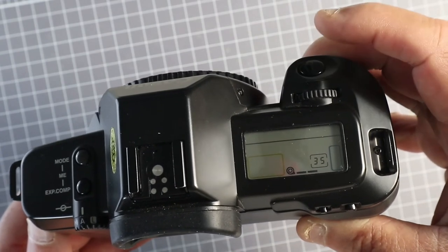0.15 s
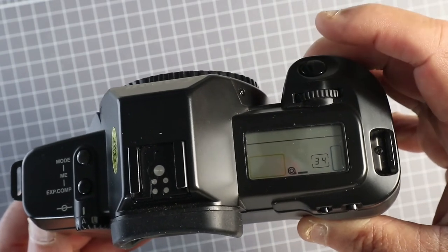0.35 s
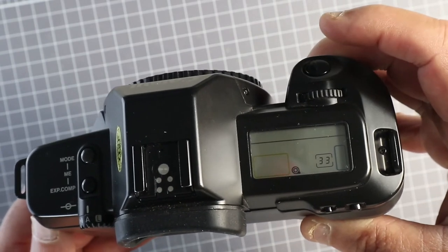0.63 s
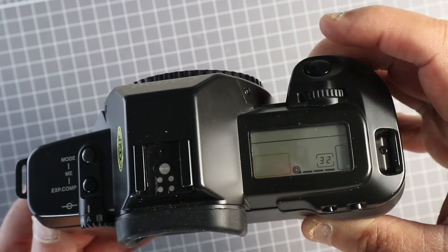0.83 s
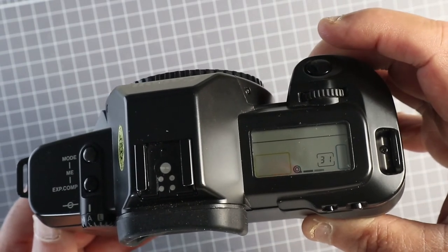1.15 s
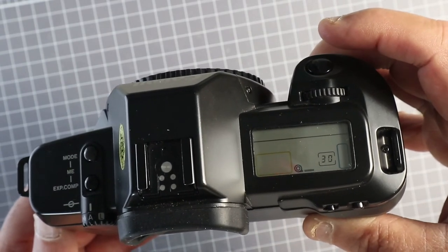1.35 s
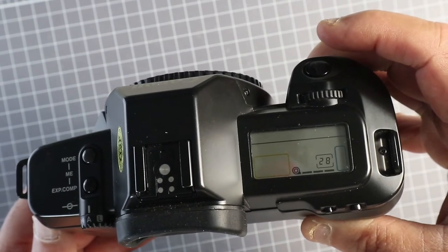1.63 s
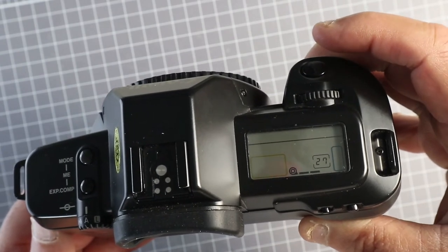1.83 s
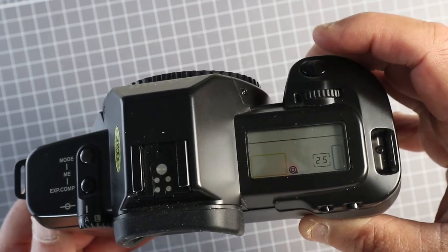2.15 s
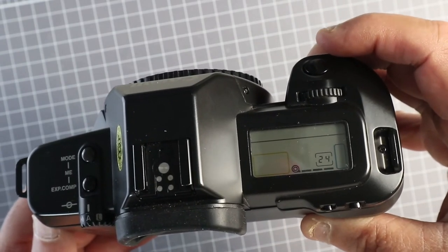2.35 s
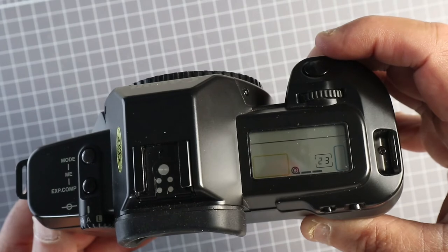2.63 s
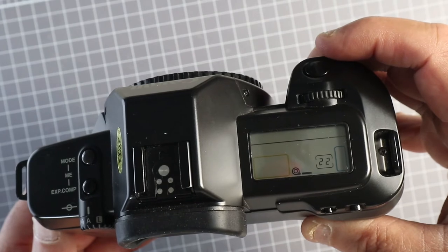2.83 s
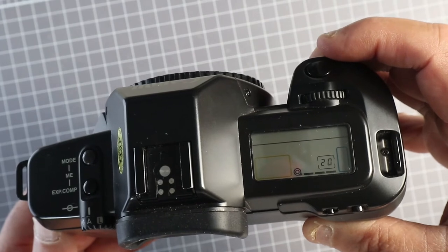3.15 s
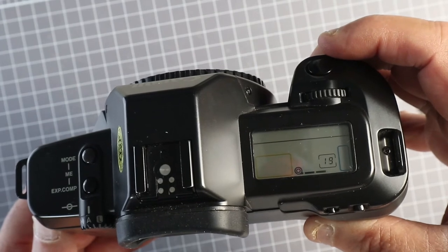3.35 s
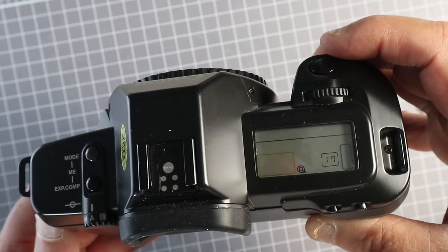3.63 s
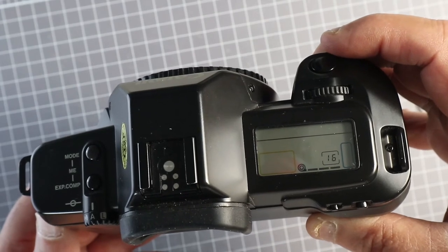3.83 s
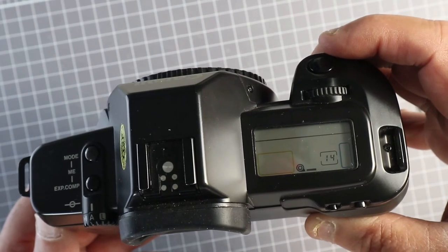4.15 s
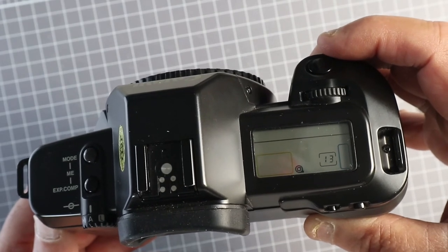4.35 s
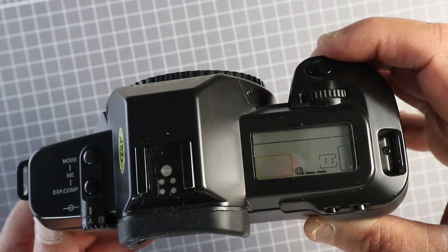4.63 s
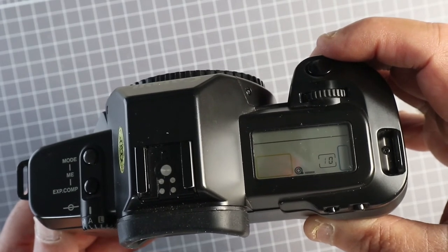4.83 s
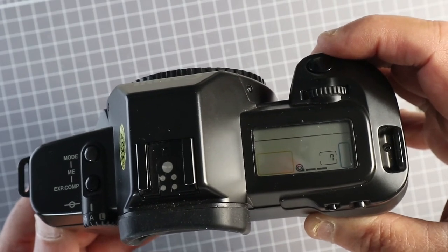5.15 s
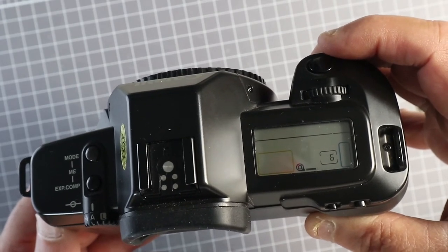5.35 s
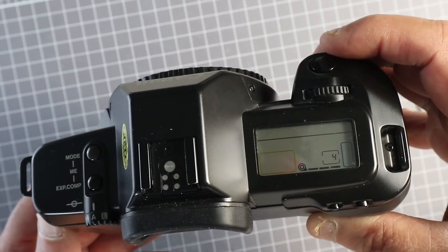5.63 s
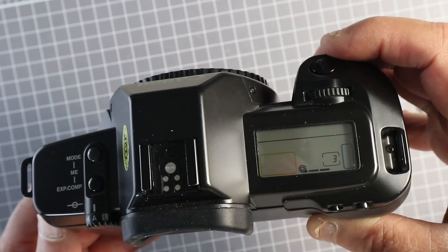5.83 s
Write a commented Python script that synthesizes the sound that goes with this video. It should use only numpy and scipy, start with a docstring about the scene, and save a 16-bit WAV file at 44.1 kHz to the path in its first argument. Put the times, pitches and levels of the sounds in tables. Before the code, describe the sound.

A small camera's geared motor whines steadily up close as it winds film back, rattling finely, with soft plastic knocks growing more frequent near the end.

```python
"""A geared motor spins up and whines close to the microphone: a small camera winding its film back.
The whine sums gear-mesh harmonics with side tones; it slows as the spool fills. Noise makes the rattle.
A second, steadier motor already runs beside it: thin tones and pulsing brush hiss.
The spool knocks softly in the plastic body, as struck resonances ringing out.
Behind them lie mains hum and the low noise of a quiet room."""
import sys
import numpy as np
from scipy import signal
from scipy.fft import rfft, irfft, next_fast_len
from scipy.io import wavfile

SR = 44100
rng = np.random.default_rng(int(sys.argv[2]) if len(sys.argv) > 2 else 0)


def volts_from_db(level):
    """Convert decibel levels to linear amplitude ratios."""
    exponent = np.asarray(level, float) / 20
    return 10 ** exponent


def transcribe(signal):
    """Save signal, clipped to [-1, 1], as a 16-bit WAV file at the path in sys.argv[1]."""
    frames = np.atleast_2d(signal).T
    limited = np.clip(frames, -1, 1)
    pcm = np.round(limited * 32767).astype(np.int16)
    wavfile.write(sys.argv[1], SR, pcm)


N = 264159  # samples

WHEEL_TEETH, PINION_TEETH = 23, 10

# base levels beside and within the geared motor, before trims and wavers:
# time_s, strongest_steady_tone_db, fifth_geared_shaft_harmonic_db, second_steady_tone_db
TONE_LEVELS = [(0.0, -44, -61, -49), (0.1, -39, -55, -40), (0.3, -37, -53, -46), (1.05, -36.5, -38.5, -40),
               (1.5, -38, -46.5, -43), (2.7, -37.5, -39, -46.5), (4.3, -37, -43.5, -49),
               (4.8, -37, -45, -45), (5.99, -36, -47, -47)]


def rms_one(x):
    """Scales a real or complex signal to rms 1."""
    return x / np.sqrt(np.mean(np.abs(x) ** 2) + 1e-20)


def in_time(rows):
    """Draws each column of a timed table as a line over the whole take."""
    s, *columns = np.transpose(rows)
    t = np.arange(N) / SR
    return [np.interp(t, s, column) for column in columns]


def drift(hz):
    """A slow random waver: white noise twice through a one-pole low-pass, run in; rms 1."""
    r = np.exp(-2 * np.pi * hz / SR)
    noise = rng.standard_normal(N + SR)
    return rms_one(signal.lfilter([1], [1, -2 * r, r * r], noise)[SR:])


def uneven(hz):
    """Complex noise up to hz with a steep edge; rms 1."""
    low_pass = signal.butter(3, hz, fs=SR, output="sos")
    real, imag = signal.sosfilt(low_pass, rng.standard_normal((2, N)))
    return rms_one(real + 1j * imag)


def coloured(x, spectrum):
    """Shapes a signal by a (Hz, dB) curve, drawn over log frequency; rms 1."""
    hz, db = np.transpose(spectrum)
    size = next_fast_len(N)
    log_hz = np.log(np.arange(size // 2 + 1) * SR / size + 1)
    gain = volts_from_db(np.interp(log_hz, np.log(hz), db, -80, -80))
    return rms_one(irfft(rfft(x, size) * gain, size)[:N])


def resonance(x, hz, width_hz):
    """Two-pole band-pass with gain 1 on top."""
    r = np.exp(-np.pi * width_hz / SR)
    poles = [1, -2 * r * np.cos(2 * np.pi * hz / SR), r * r]
    return signal.lfilter(np.array([1, 0, -1]) * (1 - r * r) / 2, poles, x)


def tone(turns, db):
    """A sine that follows an angle in turns; db is its rms level."""
    return np.sqrt(2) * volts_from_db(db) * np.sin(2 * np.pi * turns)


def throb(turns, db):
    """An off-round wheel bites hard once a turn: a short swell, a longer lull; rms 1."""
    a = 2 * np.pi * turns
    return rms_one(volts_from_db(db * (np.cos(a) + .45 * np.cos(2 * a) + .25 * np.cos(3 * a))))


def gear_angles():
    """Wheel and spool angles in turns; the film tugs at the speed once and twice a spool turn."""
    # first gear wheel before the tug: time_s, speed_turns_per_s
    wheel_speed = [(0, 76), (0.06, 80.5), (0.15, 81.44), (0.45, 81.221), (1.05, 80.69), (1.35, 80.664),
                   (1.65, 80.745), (2.25, 80.482), (2.85, 80.436), (3.15, 80.286), (3.45, 79.861),
                   (3.75, 79.634), (4.05, 79.698), (4.35, 79.407), (4.65, 78.917), (4.95, 78.61),
                   (5.55, 78.51), (5.99, 78.7)]
    wheel_start, spool_start = .28, -.09  # turns
    spool_ratio = .0559  # spool turns per wheel turn
    tug_share = 0.00371  # speed swing for a tug of 1
    speed, = in_time(wheel_speed)
    spool = spool_start + spool_ratio * np.cumsum(speed) / SR
    tug = np.cos(2 * np.pi * spool) - 0.19 * np.cos(4 * np.pi * spool) + 0.296 * drift(8.7)
    wheel = wheel_start + np.cumsum(speed * (1 + tug_share * tug)) / SR
    return wheel, spool


def swell_db(multiple, spool):
    """The pull of the film swells a mesh harmonic with the spool's turn, plus a random waver."""
    # swells: mesh_multiple, swells_per_spool_turn, depth_db, lag_swells
    swells = [(2, 1, 0.54, 0.28), (2, 2, 0.56, -0.35), (2, 3, 1, -0.044), (3, 1, 0.9, -0.034),
              (3, 2, 1.7, 0.45), (3, 3, 0.5, -0.16), (4, 1, .9, -0.28), (4, 2, .9, 0.42)]
    locked = 0
    for of, per_turn, depth_db, lag in swells:
        if of == multiple:
            locked = locked + depth_db * np.cos(2 * np.pi * (per_turn * spool - lag))
    return locked + 0.74 * drift(8.1)


def mesh(wheel, levels_db):
    """Pinion on wheel: clean lines with side tones that beat, over a skirt from uneven teeth."""
    # mesh harmonics: multiple, line_db over the given level, skirt_db over the line, skirt_width_hz,
    # skirt_shift_wheel_orders, skirt_throb_db, beat_lag_turns
    harmonics = [(1, -14, -1, 150, .5, 1.5, .05), (2, -1, -8.5, 260, .6, 1.0, .07),
                 (3, -.5, -8, 250, -1.2, 1.5, -.04), (4, -14, 4, 260, -1.2, 1.8, -.05)]
    # side tones of off-round wheel and pinion, before a random waver:
    # mesh_multiple, wheel_order, pinion_order, level_db against the main line
    side_tones = [(1, -2, 0, -8), (1, -1, 1, -4), (2, -1, 0, -3), (2, -2, 0, -10), (2, 3, 0, -11),
                  (2, 0, 1, -5), (2, -1, 1, -14), (3, -1, 0, -5.5), (3, -2, 0, -8), (3, -3, 0, -12),
                  (3, 2, 0, -15), (3, 0, -1, -7), (3, 0, 1, -13), (3, -1, 1, -13), (3, -3, 1, -14),
                  (4, -1, 0, -10), (4, 0, -1, -10)]
    # what the body lets out of each harmonic: gain_db
    body_gain = [0.081, 0.67, 1, 0.057]
    pinion_start = 0.37  # turns
    beat_smear = 0.038  # turns of phase by squared wheel order: the bite glides and is drawn out
    turn, out = 2j * np.pi * wheel, 0
    for row, level_db, out_db in zip(harmonics, levels_db, body_gain):
        k, db, skirt_db, width_hz, shift, throb_db, lag = row
        clean = 1
        for of, m, n, side_db in side_tones:
            if of == k:
                order = m + n * WHEEL_TEETH / PINION_TEETH
                phase = n * pinion_start - m * lag + beat_smear * m * m
                clean = clean + volts_from_db(side_db + drift(21)) * np.exp(turn * order + 2j * np.pi * phase)
        clean = rms_one(clean) * np.exp(.3j * drift(20))
        skirt = volts_from_db(skirt_db) * uneven(width_hz) * throb(wheel - lag, throb_db) * np.exp(turn * shift)
        line = ((clean + skirt) * np.exp(turn * k * WHEEL_TEETH)).real
        out = out + np.sqrt(2) * volts_from_db(db + level_db + out_db) * line
    return out


def whine(wheel, spool, second_db, third_db):
    """Mesh harmonics through the body, which cancels one band and rings just above the second."""
    base_db = [second_db, second_db, third_db, third_db]
    levels_db = [db + swell_db(k, spool) for k, db in enumerate(base_db, 1)]
    out = mesh(wheel, levels_db)
    out = out - resonance(out, 5090, 170)
    return out + volts_from_db(-8) * resonance(out, 3986, 68)


def gear_tones(wheel, running_db):
    """Shaft harmonics and the slower second gear stage, each wavering."""
    # motor shaft tones before running level and waver: shaft_multiple, level_db
    shaft_tones = [(2, -63.5), (11, -43), (13, -39), (14, -50), (16, -68)]
    # second gear stage before trims and wavers: time_s, lowest_tone_db, third_harmonic_db
    stage_levels = [(0.04, -57, -52), (0.08, -50, -44), (0.25, -46.5, -40), (1.4, -47, -43),
                    (1.7, -46, -42.5), (2.6, -47, -44.5), (3.4, -51.5, -46), (4.4, -55, -58),
                    (5.5, -52, -50), (5.99, -66, -57)]
    # its even harmonics before waver: multiple, level_db over the lowest tone's table level
    stage_evens = [(2, -5.5), (4, 2.5)]
    stage_ratio = 6.345  # tooth contacts per wheel turn
    shaft = wheel * WHEEL_TEETH / PINION_TEETH
    out = 0
    for k, db in shaft_tones:
        out = out + tone(k * shaft + 0.13 * drift(22), db + running_db + 1.65 * drift(29))
    _, fifth_db, _ = in_time(TONE_LEVELS)
    out = out + tone(5 * shaft, fifth_db - 1.5 + 1.7 * drift(4.9))
    first_db, third_db = in_time(stage_levels)
    stage = stage_ratio * wheel + 0.01 * drift(25)
    out = out + tone(stage, first_db - 0.5 + 1.9 * drift(9.2))
    out = out + tone(3 * stage, third_db + 3.0 + 2.0 * drift(20))
    for k, db in stage_evens:
        out = out + tone(k * stage, db + first_db + 2 * drift(6.5))
    return out


def rattle(wheel, level_db):
    """Dense small tooth impacts of uneven size ring the body, swelling with the wheel's turn."""
    # rattle through the body: pitch_hz, relative_level_db per Hz
    rattle_colour = [(200, -50), (500, -12), (900, -6.5), (1300, -4), (2000, -0.5), (2600, -4.5),
                     (3250, -5), (4200, -3), (4700, -5), (5050, -7), (5900, 0.5), (6450, -8.5), (7100, -6),
                     (7800, -19), (9500, -15.5)]
    # where the body's panels partly cancel the rattle: pitch_hz, width_hz
    panel_dips = [(957, 40), (1085, 90), (1235, 14), (1465, 30), (1740, 80), (2120, 29), (2290, 38),
                  (2480, 26), (3330, 23), (4780, 270)]
    size_db = 0.36 * drift(600) + 0.24 * drift(8.8) + 0.49 * drift(40)
    hits = rng.standard_normal(N) * volts_from_db(size_db) * throb(wheel, 1.5)
    for hz, width_hz in panel_dips:
        hits = hits - 0.47 * resonance(hits, hz, width_hz)
    return volts_from_db(level_db + 1.0) * coloured(hits, rattle_colour)


def knocks():
    """A soft blow and its quick rebound ring the body's low modes, each with a strength of its own."""
    # spool knocks before the final gain: time_s, blow_db
    blow_list = [(0.723, -27), (1.169, -22.5), (1.623, -24.5), (1.931, -25), (2.741, -25), (3.006, -23.5),
                 (3.265, -25), (3.348, -24), (3.894, -24), (4.377, -23.5), (4.495, -19.5), (4.613, -23.5),
                 (4.962, -21.5), (5.077, -24), (5.191, -21.5), (5.304, -18.5), (5.417, -21), (5.528, -21),
                 (5.638, -19.5), (5.749, -20), (5.857, -23.5), (5.965, -21)]
    # body modes: pitch_hz, level_db against the blow, t60_s
    body_modes = [(543, -27, 0.006), (660, -15, 0.083), (757, -8.5, 0.02), (860, -3, 0.023),
                  (990, -18, 0.008), (1320, -7.5, 0.021)]
    s, blow_db = np.transpose(blow_list)
    chance_db = rng.normal(0, 1.5, (len(s), len(body_modes)))
    out = 0
    for k, (hz, db, t60) in enumerate(body_modes):
        blows = np.full(N, 1e-18)
        blows[(s * SR).astype(int)] = volts_from_db(blow_db + db + chance_db[:, k])
        blows = blows + 0.21 * np.roll(blows, round(0.00283 * SR))  # rebound after 2.83 ms
        r, w = volts_from_db(-60 / (t60 * SR)), 2 * np.pi * hz / SR
        ring = signal.lfilter([0, np.sin(w)], [1, -2 * r * np.cos(w), r * r], blows)
        out = out + (-1) ** k * ring
    # the small body radiates no bass
    return 1.7 * signal.sosfilt(signal.butter(3, 450, "high", fs=SR, output="sos"), out)


def steady_motor(running_db):
    """A few thin tones, and brush hiss that pulses with the shaft and rings the motor can."""
    # strongest tone: time_s, pitch_hz
    steady_pitch = [(0.0, 2238), (0.05, 2208), (0.1, 2226), (5.6, 2202), (5.99, 2202)]
    # tones: ratio to the strongest, level_db over its base level, waver_db
    thin_tones = [(1.0, -.5, 1.0), (.1661, -29, 3), (.6208, -9, 3), (1.1712, -12, 3), (1.7925, -5, 2),
                  (2.18, -16, 2), (1.207, -14, 2)]
    # motor can resonances before a 1 dB lift: pitch_hz, width_hz, level_db
    can_rings = [(8250, 200, -1), (9020, 30, 0), (10100, 140, -3), (10600, 210, -5), (11500, 120, -5),
                 (12800, 49, -6), (14100, 160, -3)]
    # brush hiss: pitch_hz, relative_level_db per Hz
    brush_colour = [(4600, -21), (7800, -3.5), (9000, -4.5), (9600, -4), (12900, -4), (13500, -9),
                    (14000, -4), (15200, 0), (15800, 2.5)]
    second_ratio, shaft_ratio = .7262, .1039  # tone cycles, shaft turns per cycle of the strongest tone
    hz, = in_time(steady_pitch)
    strongest_db, _, second_db = in_time(TONE_LEVELS)
    turns = np.cumsum(hz) / SR
    shaft = shaft_ratio * turns
    out = 0
    for ratio, rel_db, waver_db in thin_tones:
        level_db = strongest_db + rel_db + waver_db * drift(2.5)
        out = out + tone(ratio * turns + 0.085 * drift(5.9), level_db)
    second_turns = second_ratio * turns + 0.16 * drift(17)
    out = out + tone(second_turns, second_db - 0.5 + 4.8 * drift(7.1))
    pulse = throb(shaft, 1.5) * throb(shaft / 6, 0.27)
    sparks = rng.standard_normal(N) * pulse * volts_from_db(0.66 * drift(300))
    hiss = sparks
    for ring_hz, width_hz, ring_db in can_rings:
        hiss = hiss + volts_from_db(ring_db + 1.0) * resonance(sparks, ring_hz, width_hz)
    # part of the hiss level follows the gear rattle's level
    return out + volts_from_db(-36.5 + 0.39 * running_db) * coloured(hiss, brush_colour)


def room():
    """Low rumble from shaped noise, and mains hum from two wavering tones."""
    # mains hum: pitch_hz, level_db, waver_db
    hum_tones = [(99.2, -53.5, 1.5), (198.3, -58.5, 2)]
    # room rumble: pitch_hz, relative_level_db per Hz
    room_colour = [(20, -14), (35, -6), (55, -1.5), (130, -6), (300, -4.5), (500, -4.5)]
    t = np.arange(N) / SR
    hum = sum(tone(hz * t, db + waver_db * drift(6.7)) for hz, db, waver_db in hum_tones)
    return hum + volts_from_db(-51.5) * coloured(rng.standard_normal(N), room_colour)


def scene():
    """The rewinding gears up close, their knocking spool, the steady motor and the room; one channel."""
    # base levels of the geared motor: time_s, second_mesh_harmonic_db, third_mesh_harmonic_db, rattle_db
    whine_levels = [(0.0, -37, -44, -36.5), (0.035, -44, -33, -37), (0.055, -47, -45, -30),
                    (0.075, -31, -41, -26.5), (0.1, -29.5, -27.5, -30.5), (0.25, -29, -31.5, -28),
                    (0.52, -26.5, -28, -27), (0.62, -29, -28, -27), (2.6, -28.5, -27.5, -27),
                    (3.6, -26.5, -28.5, -26.5), (4.7, -27.5, -27.5, -26.5), (5.99, -29.5, -28, -26)]
    second_db, third_db, rattle_db = in_time(whine_levels)
    running_db = rattle_db - np.median(rattle_db)
    wheel, spool = gear_angles()
    gears = whine(wheel, spool, second_db, third_db)
    gears = gears + gear_tones(wheel, running_db) + rattle(wheel, rattle_db)
    return (gears + knocks() + steady_motor(running_db) + room())[None]


def top_cut(x):
    """Nothing passes above the cut-off."""
    return signal.sosfilt(signal.butter(12, 15910, fs=SR, output="sos"), x)


def record(dry):
    """A steep elliptic low-pass cuts the top above 15765 Hz."""
    low_pass = signal.ellip(12, .5, 50, 15765, fs=SR, output="sos")
    mix = signal.sosfilt(low_pass, dry)
    return top_cut(mix)


dry = scene()
out = record(dry)
transcribe(out)
```